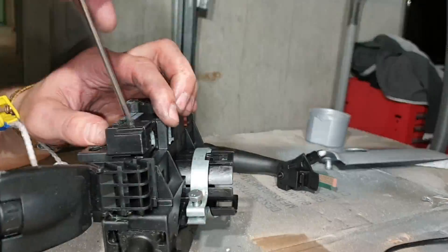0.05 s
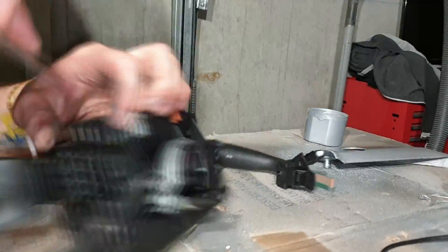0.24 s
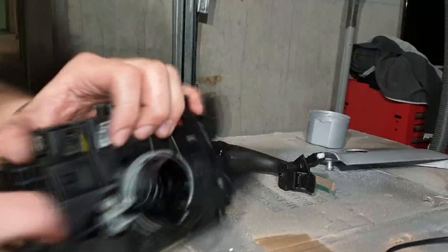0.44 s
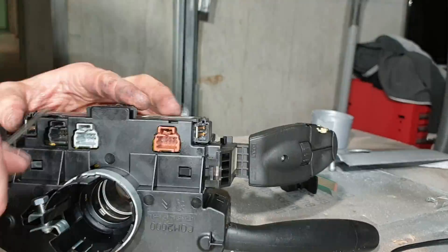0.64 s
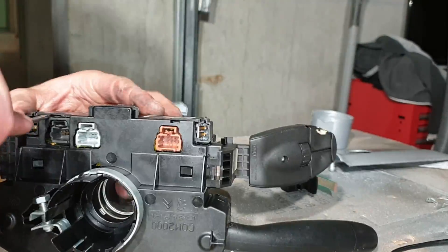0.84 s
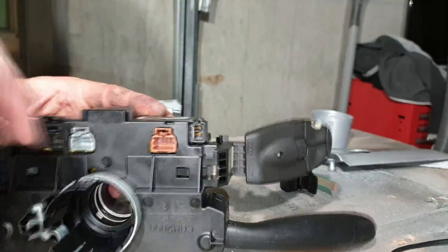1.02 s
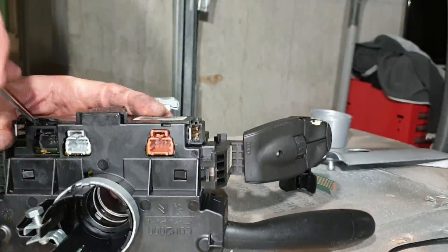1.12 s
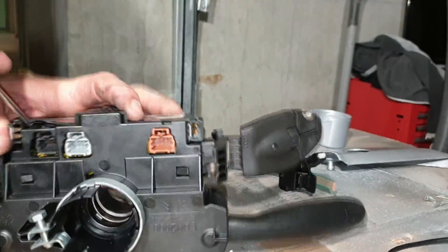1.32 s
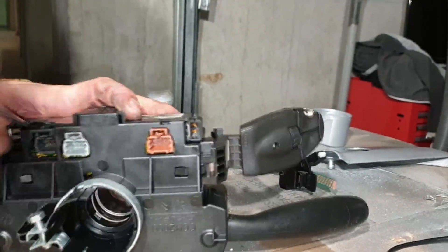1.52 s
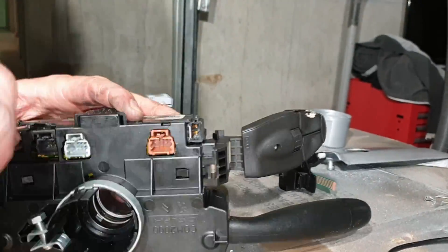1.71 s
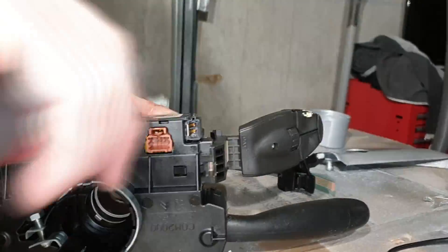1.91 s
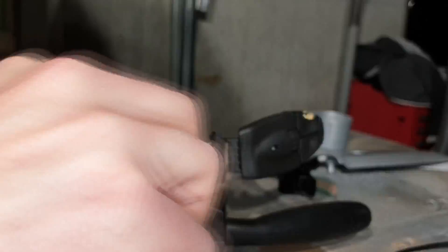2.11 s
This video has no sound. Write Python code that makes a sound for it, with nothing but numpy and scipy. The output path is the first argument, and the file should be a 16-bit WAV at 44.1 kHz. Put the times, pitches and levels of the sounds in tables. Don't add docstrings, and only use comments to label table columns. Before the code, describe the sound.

Plastic switch unit scrapes and knocks on a workbench, then clips snap sharply under a screwdriver

```python
import sys
import numpy as np
from scipy import signal
from scipy.fft import rfft, irfft
from scipy.io import wavfile
from scipy.ndimage import uniform_filter1d

SR = 44100
rng = np.random.default_rng(int(sys.argv[2]) if len(sys.argv) > 2 else 0)


def volts_from_db(level):
    exponent = np.asarray(level, float) / 20
    return 10 ** exponent


def store_wav(level_fs):
    pcm = np.round(np.clip(np.atleast_2d(level_fs), -1, 1) * 32767)
    wavfile.write(sys.argv[1], SR, pcm.T.astype(np.int16))


N = 94815
TIME = np.arange(N) / SR
HZ = np.fft.rfftfreq(N, 1 / SR)


def evened(x):
    return x / np.sqrt(np.mean(x ** 2) + 1e-20)


def read(points, hz):
    f, value = np.transpose(points)
    return np.interp(np.log(hz + 1), np.log(f + 1), value)


def colour(x, points):
    return irfft(rfft(x) * volts_from_db(read(points, HZ)), N)


def ring(x, hz, width_hz):
    r = np.exp(-np.pi * width_hz / SR)
    return signal.lfilter([1 - r, 0, r - 1], [1, -2 * r * np.cos(2 * np.pi * hz / SR), r * r], x)


def ring_twice(x, hz, width_hz, second_width_hz):
    return evened(ring(ring(x, hz, width_hz), hz, second_width_hz))


def grains(per_s, spread_db):
    chance, side, size = rng.random((3, N))
    strength = volts_from_db(spread_db * np.minimum(-np.log(size + 1e-9), 4))
    return evened((chance < per_s / SR) * np.sign(side - 0.5) * strength)


def stroke(start_s, length_s):
    t = TIME - start_s
    swell = np.sin(np.pi / 2 * np.clip(t / (0.4 * length_s), 0, 1)) ** 2
    ease_db = -756 * np.maximum(t - 0.66 * length_s, 0)
    return swell * volts_from_db(ease_db)


# (start [s], length [s],
# grit level [dB], hollow level [dB], bench level [dB])
STROKES = [(0.011, 0.034, -92, -71, -96), (0.076, 0.064, -91, -80, -101), (0.221, 0.054, -46, -57.5, -71),
           (0.269, 0.1, -48, -45, -44), (0.338, 0.1, -65, -61.5, -54), (0.42, 0.046, -66.5, -64.5, -50.5),
           (0.457, 0.11, -57.5, -56.5, -54.5), (0.527, 0.086, -49.5, -39, -34.5),
           (0.6, 0.071, -69.5, -64, -87), (0.643, 0.11, -77, -75.5, -127), (0.714, 0.11, -74.5, -58.5, -64.5),
           (0.845, 0.012, -80, -88, -103), (0.876, 0.016, -79, -67, -95), (0.91, 0.18, -83, -73, -70.5),
           (0.971, 0.043, -90, -73, -83),
           (1.039, 0.055, -75.5, -73.5, -60.5), (1.059, 0.067, -60, -56.5, -55.5),
        (1.133, 0.011, -62, -47.5, -85), (1.158, 0.027, -50.5, -72, -68), (1.221, 0.091, -70.5, -64.5, -62),
        (1.356, 0.093, -67, -60.5, -50.5), (1.433, 0.045, -65, -68.5, -57.5),
        (1.532, 0.024, -81.5, -67.5, -69.5), (1.564, 0.11, -72, -66, -62.5),
        (1.685, 0.038, -73.5, -63, -61), (1.72, 0.029, -99, -103, -71), (1.759, 0.033, -76.5, -68, -63),
        (1.807, 0.041, -54, -45.5, -55), (1.97, 0.048, -77, -64.5, -61), (2.022, 0.044, -71.5, -73.5, -58),
        (2.06, 0.046, -116.5, -72.5, -61.5), (2.121, 0.04, -107, -71, -59.5)]


def scrapes():
    rows = np.array(STROKES)
    strokes = np.array([stroke(start, length) for start, length in rows[:, :2]])
    grit, hollow, bench = volts_from_db(rows[:, 2:]).T @ strokes
    return grit_hiss(grit) + hollow_ring(hollow), bench_rumble(bench)


# (pitch [Hz], level [dB])
GRIT = [(250, 7), (800, -8), (2000, 4.5), (4000, 2.5), (8000, -8), (16000, -22)]


def grit_hiss(pressure):
    same, left, right = (grains(9000, -0.5) for _ in range(3))
    shared = 0.31
    both = np.sqrt(shared) * same + np.sqrt(1 - shared) * np.array([left, right])
    return volts_from_db(8.0) * evened(colour(both, GRIT)) * pressure


# (pitch [Hz], width [Hz], level [dB])
HOLLOW = [(702, 313, -1.5), (1000, 205, 2.5), (1133, 176, 0.5), (1580, 340, -4.5), (1784, 250, -9)]


def hollow_ring(pressure):
    slips = ring(grains(640, 3), 1230, 1300)
    body = 0
    for k, (hz, width, db) in enumerate(HOLLOW):
        body = body + (-1) ** k * volts_from_db(db) * evened(ring(slips, hz, width))
    return volts_from_db(3.0) * evened(body) * pressure


# (pitch [Hz], width [Hz], level [dB])
BENCH = [(60, 50, -1.5), (131, 37.5, -4), (289.4, 120, -7.5)]
# (start [s], length [s], level [dB], pitch [Hz])
BUMPS = [
    (0.236, 0.04, -47, 60),
    (0.548, 0.027, -48, 113),
    (0.648, 0.043, -61, 53.7),
    (1.073, 0.058, -50, 59),
    (1.157, 0.037, -53.5, 130),
    (1.976, 0.078, -56.5, 310),
]


def bench_rumble(pressure):
    shake = rng.standard_normal(N)
    rumble = sum(volts_from_db(db) * ring_twice(shake, hz, width, 2 * width) for hz, width, db in BENCH)
    out = volts_from_db(-3.0) * evened(rumble) * pressure
    for start, length, db, hz in BUMPS:
        out = out + volts_from_db(db) * stroke(start, length) * ring_twice(shake, hz, 0.41 * hz, 2.05 * hz)
    return out


# (time [s], peak level [dB], main pitch [Hz], shell re peak [dB], crack re peak [dB])
CLICKS = [(0.023, -55, 770, -21.5, -28), (0.085, -65.5, 2570, -2, -22), (0.289, -34, 1350, -28, -35),
          (0.31, -30, 1080, -23, -28), (0.314, -30.5, 1600, -33, -26), (0.328, -26, 1126, -27, -16),
          (0.532, -30, 1040, -27, -28), (0.555, -41.5, 993, -15, -28), (0.567, -32, 1190, -23.5, -30),
          (0.58, -18, 1080, -34, -28), (0.587, -27, 1000, -47, -40), (0.598, -29.5, 940, -51, -43),
          (0.756, -57.5, 955, -12.5, -30), (0.771, -40, 930, -27, -39), (0.829, -58.5, 780, -29, -18),
          (0.885, -58.5, 780, -22, -24), (0.983, -43, 1040, -42, -40), (1.018, -46, 1080, -42, -40),
          (1.081, -32, 974, -30, -33), (1.094, -38, 1914, -15, -5.5), (1.13, -37, 1050, -22, -18),
          (1.146, -37, 950, -16.5, -17), (1.161, -18, 1040, -20, -12), (1.177, -27.5, 910, -17, -15),
          (1.393, -29.5, 1000, -29, -40), (1.539, -68, 1156, -6.5, -9), (1.626, -47.5, 1070, -24, -29),
          (1.705, -61.5, 920, -6, 3), (1.812, -39, 910, -15, -12), (1.826, -22.5, 866, -18, -10.5),
          (1.856, -38, 1015, -46, -33), (1.956, -63, 865, -40, -43), (1.979, -48.5, 620, -25.5, -35),
          (1.996, -40.5, 677, -23, -48), (2.021, -46, 1060, -44, -30), (2.037, -74, 2150, -36, -26),
          (2.05, -61, 2280, -12, -21), (2.125, -55, 1590, -25, -25)]
# (pitch [Hz], level [dB], time to die by 60 dB [s])
SHELL = [(660, -24, 0.012), (1818, 1, 0.013), (2200, 8, 0.006), (2715, -0.5, 0.015), (2964, 6.5, 0.008),
         (3400, 5, 0.012), (4973, -10, 0.016), (6970, -5, 0.01)]


def clicks():
    out, t = np.zeros(N + 4000), np.arange(4000) / SR
    f, db, t60 = np.transpose(SHELL)[:, :, None]
    for start, peak_db, hz, shell_db, crack_db in CLICKS:
        level_draw, pitch_draw, phase = rng.standard_normal((3, len(SHELL), 1))
        noise = rng.standard_normal(4000)
        main = volts_from_db(-60 * t / 0.016) * np.sin(2 * np.pi * hz * t) * (1 - np.exp(-t / 0.00027))

        bright_db = shell_db + 12.0
        fading = volts_from_db(bright_db - 1 + db + 1.5 * level_draw - 60 * t / t60)
        shell = fading * np.sin(2 * np.pi * f * (1 + 0.012 * pitch_draw) * t + phase)

        burst = noise * np.exp(-t / 0.0018)
        snap = 4 * ring(ring(burst, 2200, 2400), 1947, 1900) * volts_from_db(bright_db - 4)

        decay = np.exp(-t / 0.0012)
        crack = np.diff(noise[::-1], prepend=0) * volts_from_db(crack_db - 1) * decay * (1 - decay)

        soft_start = np.minimum(t / 0.00068, 1)
        at = round((start + 0.0006) * SR)
        out[at:at + 4000] += volts_from_db(peak_db + 2.5) * ((main + snap + shell.sum(0)) * soft_start + crack)
    return out[:N]


# (pitch [Hz], peak level [dB], time to die by 60 dB [s])
BIG_MODES = [(620, -29, 0.02), (1080, -24.5, 0.019), (1830, -19.5, 0.013), (2186, -18, 0.0088),
             (2600, -21, 0.01), (3070, -17.5, 0.01), (3600, -26, .012)]


def big_snap():
    t = np.maximum(TIME - 1.8267, 0)
    out = 0
    for k, (hz, db, t60) in enumerate(BIG_MODES):
        out = out + (-1) ** k * volts_from_db(db - 60 * t / t60) * np.sin(2 * np.pi * hz * t)
    return out


# (time [s], peak level [dB], pitch
# [Hz], time to die by 60 dB [s])
PINGS = [(0.087, -54, 4200, .012), (0.244, -31.5, 4100, 0.031), (0.316, -35, 4720, 0.019),
         (1.094, -29.5, 4300, 0.013), (1.095, -35, 3000, 0.013), (1.131, -39.5, 4950, 0.01),
         (1.147, -40, 4970, .012), (1.161, -28, 3430, 0.011), (1.162, -24, 1830, 0.023),
         (1.163, -36, 873, 0.014), (1.239, -45, 2980, 0.028), (1.397, -47, 1940, 0.018),
         (1.435, -44, 2960, 0.021), (1.54, -55, 600, .01), (1.581, -48, 2980, 0.034),
         (1.615, -57, 1050, .03), (1.809, -36.5, 2920, 0.014), (0.236, -42, 61.5, 0.14),
         (0.668, -58, 60, 0.11), (1.094, -44, 6950, 0.015), (1.163, -31, 7200, 0.01),
         (0.024, -56, 2200, 0.038), (0.887, -62, 3150, 0.016), (1.004, -53, 1050, .02),
         (1.98, -47, 350, 0.045), (1.992, -47.5, 340, 0.057), (1.993, -50, 3250, .015)]


def pings():
    out, t = np.zeros(N + 4000), np.arange(4000) / SR
    for start, db, hz, t60 in PINGS:
        at = round((start + 0.0006) * SR)
        out[at:at + 4000] += volts_from_db(db - 60 * t / t60) * np.sin(2 * np.pi * hz * t) * np.minimum(t / 0.001, 1)
    return out[:N]


CREAK_STARTS = [.035, .602, .653, 1.239, 1.346, 1.437, 1.581, 1.701, 1.857]
# (length [s], level [dB], pitch
# [Hz], width [Hz])
CREAKS = [(0.19, -82.5, 6020, 440), (0.046, -69.5, 14000, 13000), (0.11, -68, 7900, 230),
          (0.008, -51, 2890, 290), (0.024, -70.5, 940, 180), (0.012, -44.5, 2960, 460),
          (0.039, -53, 2980, 550), (0.094, -75.5, 6900, 2400), (0.0047, -76, 800, 390)]


def creaks():
    slips = grains(4000, 2.5)
    out = 0
    for start, (length, db, hz, width) in zip(CREAK_STARTS, CREAKS):
        t = TIME - start
        catch = np.clip(t / 0.002, 0, 1)
        release_db = -1200 * np.maximum(t - length, 0)
        out = out + volts_from_db(db + release_db) * catch * ring_twice(slips, hz, width, 2 * width)
    return out


# (pitch [Hz], time to die by 60 dB [s])
GARAGE = [(200, 0.026), (1000, 0.12), (3000, 0.098), (10000, 0.015)]


def garage(x):
    out, turn = 0, 9 * TIME
    for k in range(3):
        taps = rng.standard_normal((2, SR // 2))
        hz, t, z = signal.stft(taps, SR, nperseg=256)
        tail = signal.istft(z * volts_from_db(-60 * t / read(GARAGE, hz)[:, None]), SR, nperseg=256)[1]
        tail[:, :200] = 0
        tail *= volts_from_db(-17.5) / np.linalg.norm(tail[0])
        near = taps[:, :900] * np.exp(-np.arange(900) / SR / 0.003)
        tail[:, :900] += volts_from_db(-11) * near / np.linalg.norm(near, axis=1)[:, None]
        share = np.sqrt(2 / 3) * np.cos(turn + k * np.pi / 3)
        out = out + signal.fftconvolve(x * share, tail, axes=1)[:, :N]
    return out


# (pitch [Hz], level [dB])
AIR = [(30, -6.5), (90, 9.5), (170, 2), (400, -8), (1000, -11.5), (2000, -11.5), (7000, -20), (9000, -58.5),
       (13000, -33.5)]
# (time [s], level [dB])
HIGH_HISS = [(0, -94), (.4, -102), (1.9, -90), (1.94, -100.5)]


def air():
    left, right = rng.standard_normal((2, N))
    right = 0.45 * left + 0.4 * right
    hush = volts_from_db(-73.5) * evened(colour(np.array([left, right]), AIR))
    sway = volts_from_db(3 * evened(uniform_filter1d(rng.standard_normal((2, N)), 2500)))
    high_noise = evened(ring(rng.standard_normal((2, N)), 12500, 5000))
    high_hiss = volts_from_db(np.interp(TIME, *np.transpose(HIGH_HISS))) * high_noise
    return (hush * sway[0] + high_hiss * sway[1]) * np.minimum(TIME / 0.012, 1)


# (pitch [Hz], level [dB])
LEFT = [(60, 1), (250, 2), (600, 5), (1300, 5.5), (3500, 4.5), (9000, 6), (15000, 9)]
# (pitch [Hz], delay [s])
LAG = [(250, .00012), (800, 0.00023), (2400, 0.00012), (5000, 0.00019)]


def place_left(x):
    wet = rfft(x)
    middle = wet.mean(0)
    wet = middle + (wet - middle) / (1 + (304 / (HZ + 1)) ** 4)
    lean = volts_from_db(read(LEFT, HZ) / 2)
    late = np.exp(-2j * np.pi * HZ * read(LAG, HZ))
    return irfft(wet * [lean, late / lean], N)


def scene():
    rub, low = scrapes()
    unit = rub + clicks() + big_snap() + pings() + creaks()
    bench = low * volts_from_db([[0.6], [-0.6]])
    bench_sides = volts_from_db(-14) * np.roll(low, 300) * [[1], [-1]]
    return place_left(unit + garage(unit)) + bench + bench_sides + air()


def top_cut(x):
    return signal.sosfilt(signal.butter(12, 16810, fs=SR, output="sos"), x)


# (pitch [Hz], level [dB])
MIC = [(5500, -1), (7000, 6), (8600, 4), (11500, 11)]
# (pitch [Hz], level [dB])
EDGE = [(15750, 0), (16050, -38)]


def record(dry):
    mix = colour(colour(dry, MIC), EDGE)
    return top_cut(mix)


dry = scene()
out = record(dry)
store_wav(out)
```